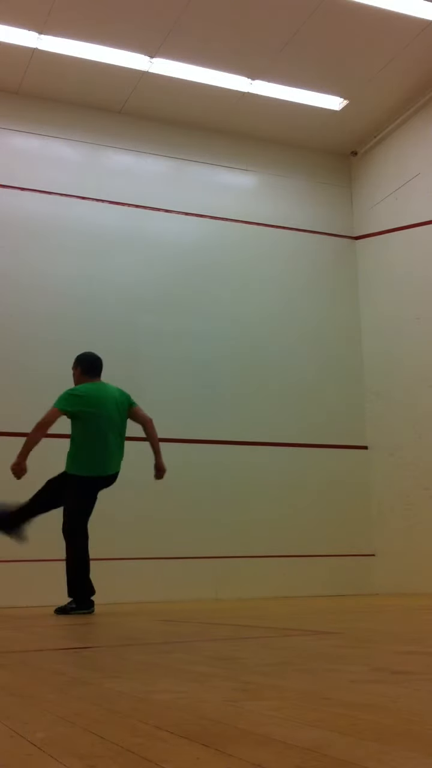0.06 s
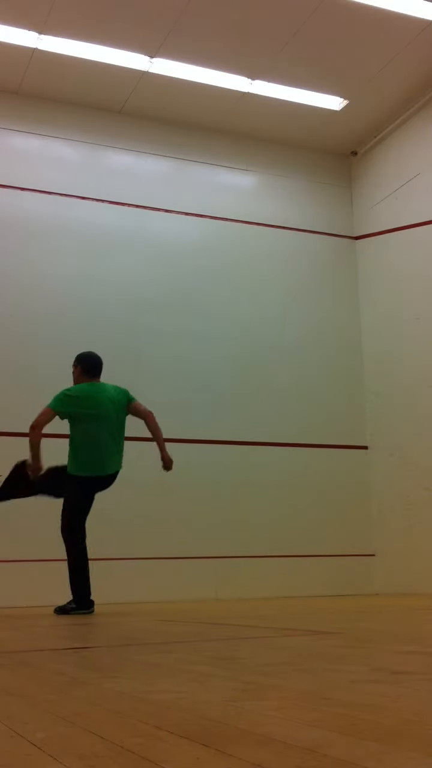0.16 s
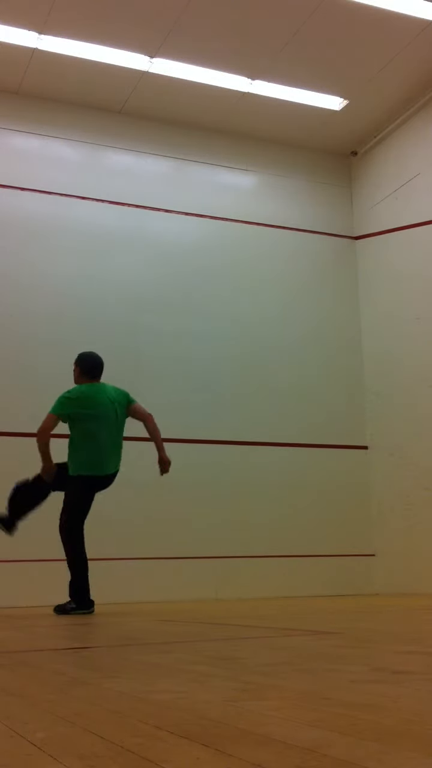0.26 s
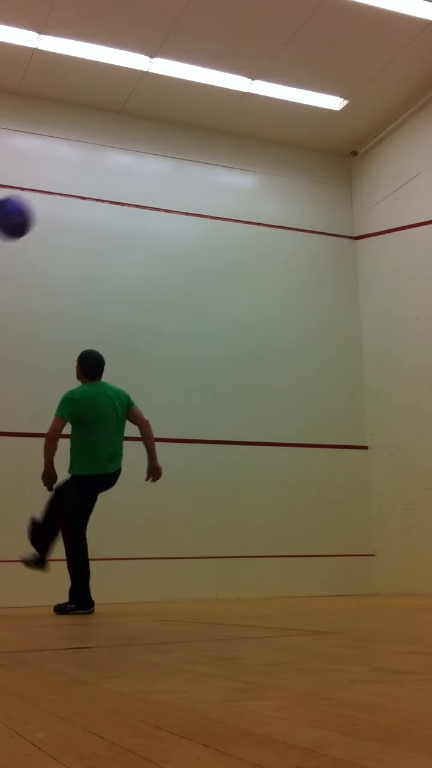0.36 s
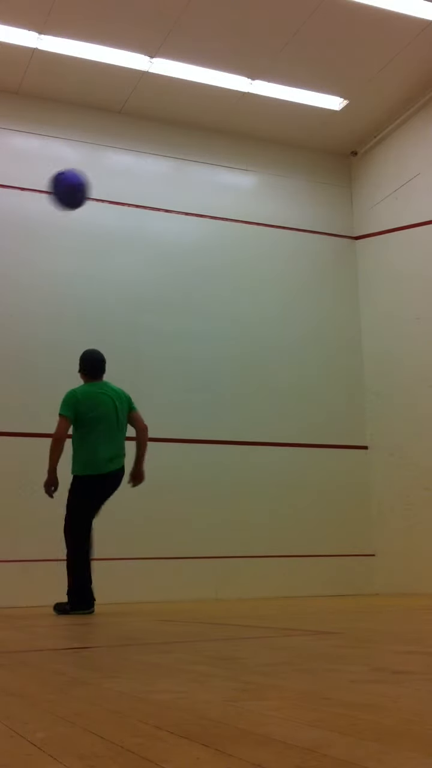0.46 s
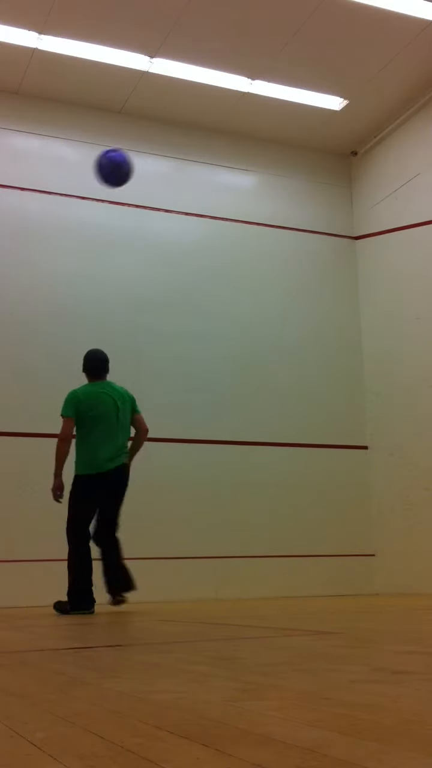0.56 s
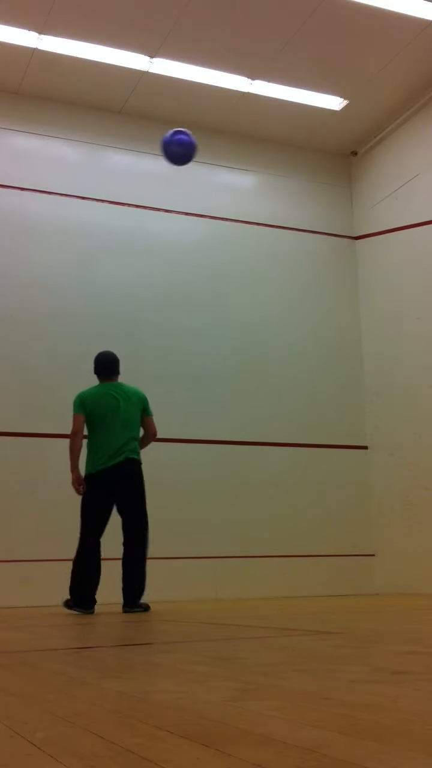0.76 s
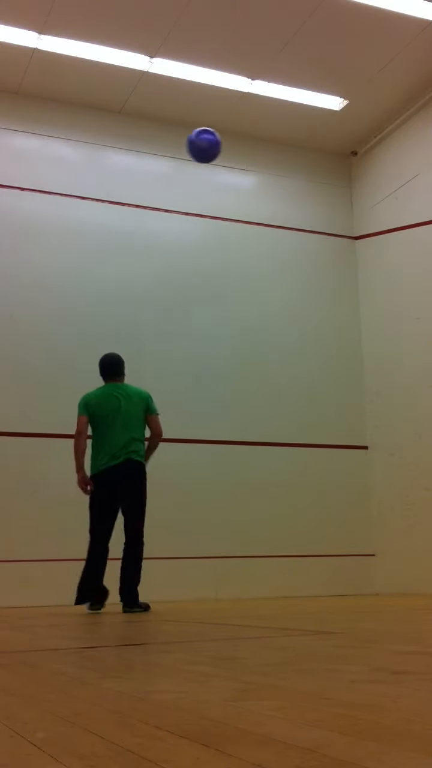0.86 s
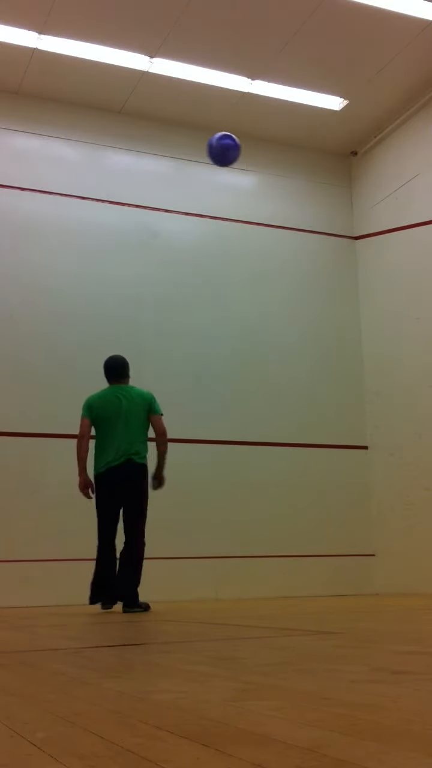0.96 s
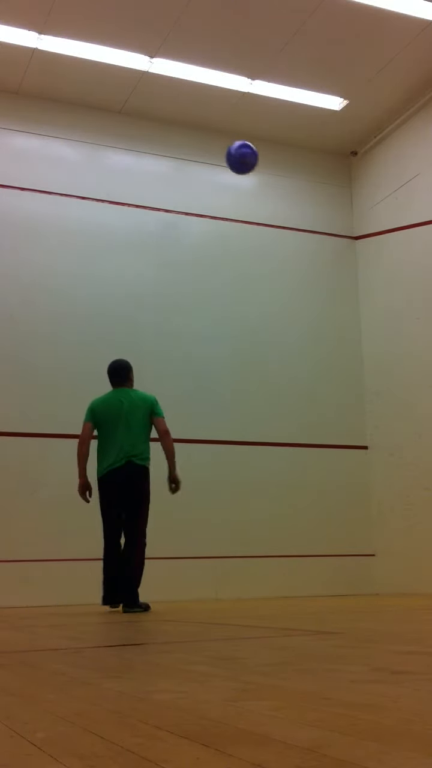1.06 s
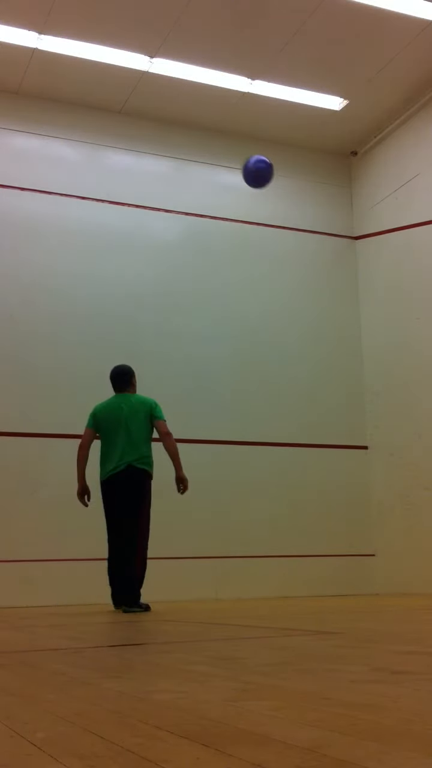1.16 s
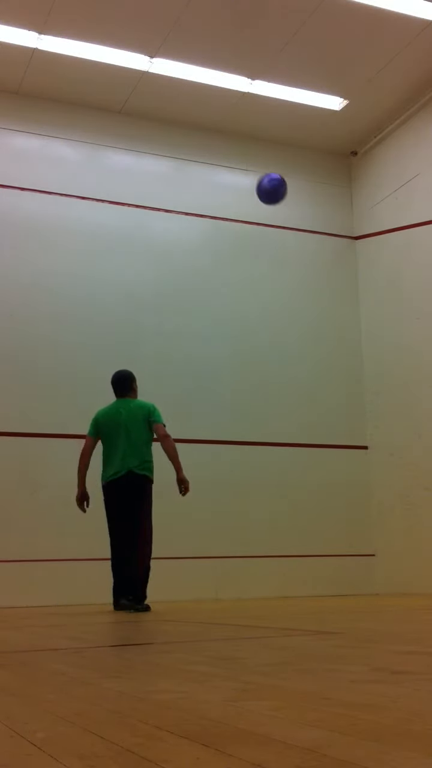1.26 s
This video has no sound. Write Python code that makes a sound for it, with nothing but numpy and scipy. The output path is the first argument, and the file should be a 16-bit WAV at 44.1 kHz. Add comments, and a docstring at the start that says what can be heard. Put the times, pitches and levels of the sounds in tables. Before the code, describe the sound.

A ball is kicked and smacks an indoor court wall, leaving a long booming echo.

```python
"""Football against the wall of an indoor court

One microphone in a hard-walled court. A ball is kicked and hits the front wall a seventh of a second
later. Each blow is a sharp slap of the skin plus the short ring of the ball; floor and wall add low
thuds. Distinct echoes thicken into a long booming tail, over a room tone of ventilation hum, hiss,
a faint electrical whine and the wash left by earlier play."""
import sys
import numpy as np
from scipy import signal
from scipy.fft import rfft, irfft
from scipy.io import wavfile
from scipy.ndimage import uniform_filter1d

SR = 44100
rng = np.random.default_rng(int(sys.argv[2]) if len(sys.argv) > 2 else 0)


def transcribe(u):
    """Save the signal u as a 16-bit wav file named by the first command-line argument.

    u: samples, shape (n,) or (channels, n), limited to [-1, 1]; the rate is SR.
    q: integer samples, one column per channel.
    """
    v = np.clip(np.atleast_2d(u).T, -1, 1)
    q = np.round(v * 32767).astype(np.int16)
    wavfile.write(sys.argv[1], SR, q)


N = 57330
TIME = np.arange(N) / SR

# room tone: the fading wash and the steady hiss (f/Hz, level/dB per Hz)
WASH_SPECTRUM = [(30, -100), (65, -99), (115, -68), (200, -68), (300, -67), (500, -73), (1000, -78),
                 (2000, -83), (3000, -90), (3800, -88), (4800, -97), (8000, -103), (15000, -112)]
HISS_SPECTRUM = [(30, -100), (120, -77.5), (500, -86), (2000, -94), (4000, -102), (8000, -111),
                 (15000, -121)]
# reverberation time of the court (f/Hz, t60/s)
COURT_T60 = [(60, 1.13), (170, 1.5), (250, 1.64), (330, 2.62), (420, 2.42), (600, 2.8), (1200, 2.81),
             (2200, 2.11), (4000, 1.81), (7000, 1.24), (10000, 0.76), (15000, 0.42)]
# diffuse sound raised by each blow (f/Hz, level/dB per Hz)
KICK_TAIL = [(35, -84), (70, -64), (115, -54), (160, -50.5), (230, -48), (310, -40.5), (450, -53),
             (750, -62), (1200, -61.5), (2200, -62.5), (3600, -76), (6500, -73), (10000, -77), (15000, -84)]
WALL_TAIL = [(35, -85.5), (70, -58.5), (130, -63), (195, -41), (260, -37), (350, -36.5), (450, -45),
             (650, -52.5), (1100, -54.5), (1600, -57.5), (2200, -58.5), (3000, -64), (4300, -67),
             (6500, -68.5), (10000, -69.5), (15000, -82)]
# resonances that linger after the wall hit: the court's boom and the ball's hollow ring
# (f/Hz, level/dB, swell/s, t60/s)
LINGERING_MODES = [(108.7, -32, 0.031, 1.6), (195.9, -17.5, .01, .6), (226.5, -16.5, 0.019, 1.23),
                   (251, -16.5, 0.033, 1.37), (289, -25, 0.036, 1.6), (301.2, -26, 0.086, 3.6),
                   (322.7, -19.5, 0.05, 2.4), (351.3, -11.5, 0.045, 1.33), (360.4, -18, 0.099, 2.24),
                   (799, -28.5, 0.092, 1.5), (979, -32.5, 0.069, 1.6), (1096, -29, 0.12, 2.06),
                   (1550, -35, 0.06, 2.16), (2098, -34.5, 0.021, 1.8)]
# first echoes at the microphone, off floor, walls and ceiling (t/s, slap level/dB, ring level/dB)
KICK_ECHOES = [(.0183, -22, -8), (.0201, -10, -14), (.0295, -8, -22), (.0375, -18, -15), (.0391, -9, -24),
               (.066, -18, -14)]
WALL_ECHOES = [(.0132, -3, -5), (.015, -2, -5), (.0237, -2, -6), (.0323, -4.5, -6), (.0505, -7, -8),
               (.0655, -12, -8), (.0792, -12, -12), (.0892, -13, -8)]
# resonances of the ball, the wooden floor and the struck wall (f/Hz, relative level/dB, t60/s)
BALL_MODES = [(317, -9, .04), (481, -7.5, 0.026), (1197, -6, 0.013), (1480, -17, 0.024), (2100, -25, 0.016)]
FLOOR_MODES = [(142.3, -21, 0.22), (195, -27, .45)]
WALL_MODES = [(79, -30, 0.082), (177, -23, 0.067), (258, -21, 0.062), (590, -21, .035), (880, -22, .025)]
# broad, very short resonances of the skin's slap (f/Hz, relative level/dB, t60/s)
KICK_SKIN_MODES = [(5400, -10.5, 0.0011), (8700, -12.5, 0.00064), (13900, -6, 0.0006)]
WALL_SKIN_MODES = [(3220, -10, .001), (6700, -3, 0.00069), (12200, -9, 0.00035)]

KICK_S, WALL_S = 0.2264, 0.3626


def from_db(db):
    """Decibels to gain."""
    return 10 ** (np.asarray(db) / 20)


def at_hz(points, hz):
    """Read a table on a log-frequency axis."""
    f, value = np.transpose(points)
    return np.interp(np.log(hz), np.log(f), value)


def delayed(x, s):
    """The same sound, s seconds later."""
    return np.concatenate([np.zeros(int(s * SR)), x])[:N]


def dying(t60):
    """Envelope that loses 60 dB in t60 seconds."""
    return np.exp(-np.log(1000) * TIME / t60)


def bands(white):
    """Split white noise into overlapping quarter octaves at unit power per Hz: (f/Hz, band) pairs."""
    centres = 29 * 2 ** (np.arange(38) / 4)
    spectrum = rfft(white) * np.sqrt(SR / 2)
    hz = np.arange(N // 2 + 1) * SR / N
    return [(centre, irfft(spectrum * np.interp(hz, centres, weights), N))
            for centre, weights in zip(centres, np.eye(len(centres)))]


def noise(colour):
    """Noise with the given spectrum."""
    return sum(from_db(at_hz(colour, hz)) * band for hz, band in bands(rng.standard_normal(N)))


def room_tone(fade_db_per_s=17.5, hum_hz=118.7, whine_hz=14998):
    """Earlier play dies away in the hall, over hiss, ventilation hum and a faint electrical whine."""
    wash = noise(WASH_SPECTRUM) * from_db(-fade_db_per_s * TIME)
    hum = from_db(-56) * np.sin(2 * np.pi * hum_hz * TIME)
    whine = from_db(-80) * np.sin(2 * np.pi * whine_hz * TIME)
    return wash + noise(HISS_SPECTRUM) + hum + whine


def steadied(band, window_s=0.095, evenness=0.96):
    """Even out a band's slow level so the reverberation fades smoothly."""
    power = uniform_filter1d(band ** 2, int(window_s * SR)) + 1e-20
    return band * (power.mean() / power) ** (evenness / 2)


def reflections(first_per_s=500, thicken_s=.04, scatter_share=0.42):
    """Echoes off the hard walls reach the microphone ever more densely, mixed with scattered sound."""
    chance = np.minimum(first_per_s * (1 + (TIME / thicken_s) ** 2) / SR, 1)
    specular = (rng.random(N) < chance) * rng.choice([-1, 1], N) / np.sqrt(chance)
    return np.sqrt(1 - scatter_share) * specular + np.sqrt(scatter_share) * rng.standard_normal(N)


def court_tail(colour, gap_s, build_s, slow_build_hz=1530):
    """Reverberation swells and dies band by band; the treble builds last and dies first."""
    near_scatter = from_db(-19.5)  # from close to the blow, ahead of the first echo
    since_gap = np.maximum(TIME - gap_s, 0)
    out = 0
    for hz, band in bands(reflections()):
        swell = 1 - np.exp(-since_gap / (build_s * (1 + hz / slow_build_hz)))
        envelope = np.maximum(swell, near_scatter) * dying(at_hz(COURT_T60, hz))
        out += from_db(at_hz(colour, hz)) * steadied(band) * envelope
    return out


def waver(rate_hz):
    """Slow random drift of level and phase: complex, with an RMS of 1."""
    white = rng.standard_normal(N) + 1j * rng.standard_normal(N)
    low_pass = np.exp(-(np.fft.fftfreq(N, 1 / SR) / rate_hz) ** 2)
    slow = np.fft.ifft(np.fft.fft(white) * low_pass)
    return slow / np.sqrt(np.mean(np.abs(slow) ** 2))


def lingering_resonances(waver_depth=0.37, waver_per_cycle=0.015):
    """The court's boom and the ball's hollow ring swell and linger, wavering faster at high pitch."""
    out = 0
    for hz, db, swell_s, t60 in LINGERING_MODES:
        # close neighbours make each resonance waver
        strength = np.sqrt(1 - waver_depth ** 2) + waver_depth * waver(waver_per_cycle * hz)
        tone = np.imag(strength * np.exp(2j * np.pi * hz * TIME))
        swell = 1 - np.exp(-TIME / swell_s)
        out += from_db(db) * tone * swell * dying(t60)
    return out


def ring(modes, low_cut_hz=134):
    """Damped sines of a struck body, with the deep bass cut away."""
    tones = sum(from_db(db) * np.sin(2 * np.pi * hz * TIME) * dying(t60) for hz, db, t60 in modes)
    high_pass = signal.butter(2, low_cut_hz, "high", fs=SR, output="sos")
    return signal.sosfilt(high_pass, tones + 1e-18)


def ball_pock(soft_contact_hz=2440):
    """The shell and the air inside it ring hollow; the yielding contact excites little treble."""
    low_pass = signal.butter(4, soft_contact_hz, fs=SR, output="sos")
    return signal.sosfilt(low_pass, ring(BALL_MODES) + 1e-18)


def skin_slap(crack, rustle=.08, decay_s=.0012):
    """The skin meets a hard surface: a sharp crack with a very short rustle."""
    burst = rustle * rng.standard_normal(len(crack)) * np.exp(-TIME[:len(crack)] / decay_s)
    burst[0] = 1
    return np.pad(np.convolve(burst, crack), (0, N))[:N]


def blow(body, skin_modes, echoes, slap_low_cut_hz):
    """Slap and ring reach the microphone by the direct path, then by longer ones as distinct echoes."""
    high_pass = signal.butter(4, slap_low_cut_hz, "high", fs=SR, output="sos")
    crack = signal.sosfilt(high_pass, ring(skin_modes)[:SR // 20])
    direct = (0.00046, 0, 0)
    return -sum(delayed(from_db(slap_db) * skin_slap(crack) + from_db(ring_db) * body, delay_s)
                for delay_s, slap_db, ring_db in [direct, *echoes])


def kick(floor_delay_s=0.02394, floor_swell_s=0.0097):
    """The foot strikes the ball and the wooden floor booms under the player."""
    body = from_db(0.5) * ball_pock()
    strike = blow(body, KICK_SKIN_MODES, KICK_ECHOES, slap_low_cut_hz=4300)
    floor = ring(FLOOR_MODES) * (1 - np.exp(-TIME / floor_swell_s))
    tail = court_tail(KICK_TAIL, gap_s=.017, build_s=0.0014)
    return strike + delayed(floor, floor_delay_s) + tail


def wall_hit():
    """The ball strikes the front wall and sets the whole court booming."""
    thud = delayed(ring(WALL_MODES), .002)  # the wall yields just after the skin touches
    body = from_db(-6.5) * ball_pock() + thud
    strike = blow(body, WALL_SKIN_MODES, WALL_ECHOES, slap_low_cut_hz=2400)
    tail = court_tail(WALL_TAIL, gap_s=0.0053, build_s=0.0037)
    return strike + tail + lingering_resonances()


def scene():
    """Kick, wall hit and room tone at one microphone in the court."""
    mono = delayed(kick(), KICK_S) + delayed(wall_hit(), WALL_S) + room_tone()
    return mono[None, :]


def record(dry):
    """The microphone chain rounds the peaks and cuts the top treble."""
    ceiling, stopband_hz = .95, 17000
    low_pass = signal.cheby2(12, 70, stopband_hz, fs=SR, output="sos")
    return signal.sosfilt(low_pass, ceiling * np.tanh(dry / ceiling))


dry = scene()
out = record(dry)
transcribe(out)
```